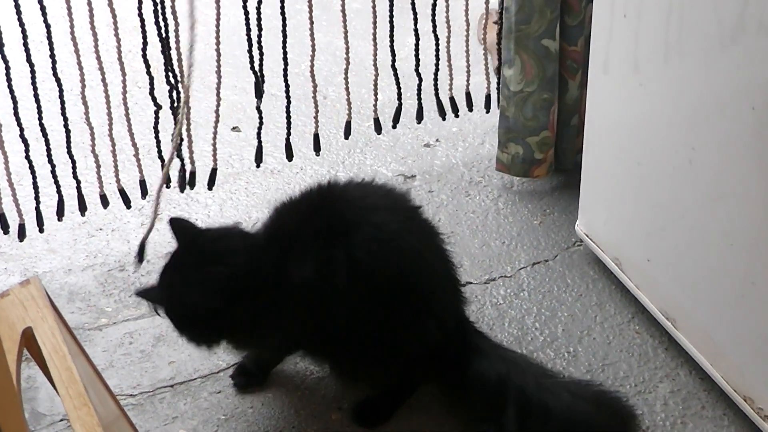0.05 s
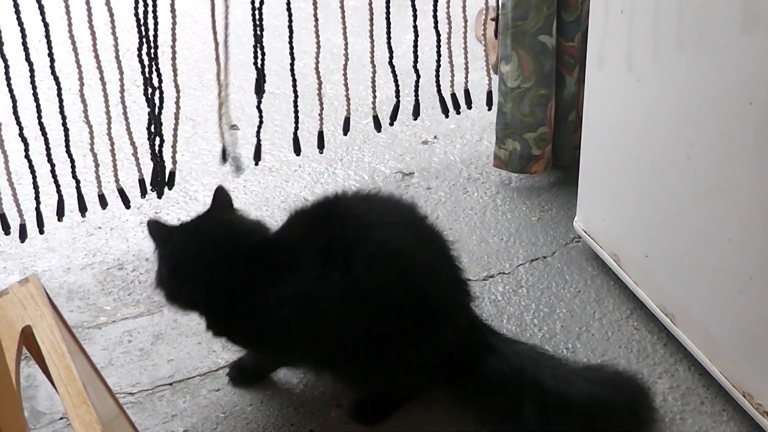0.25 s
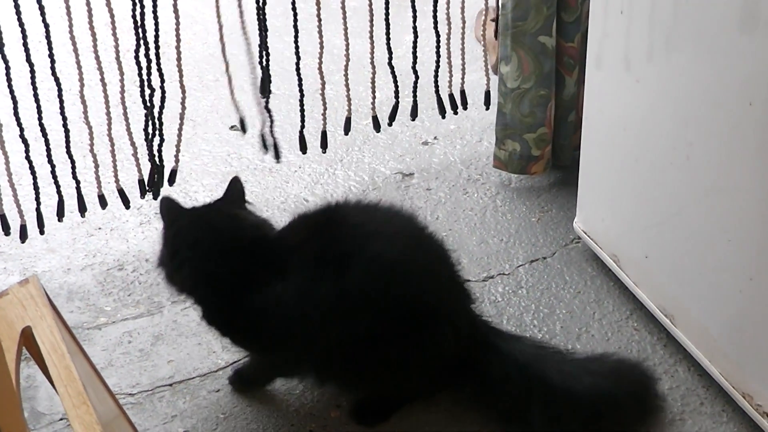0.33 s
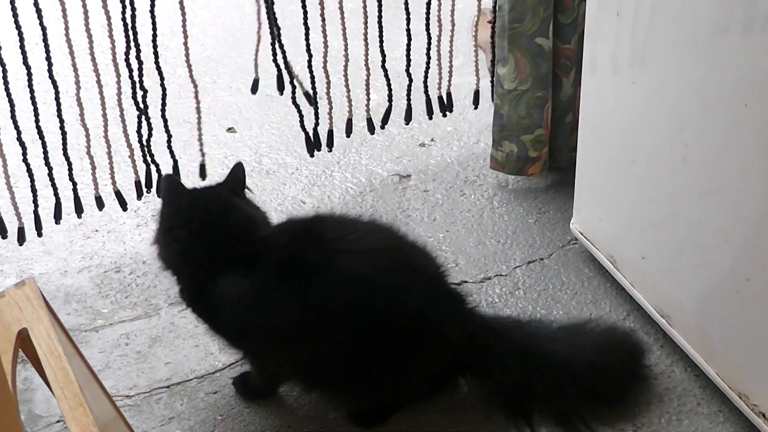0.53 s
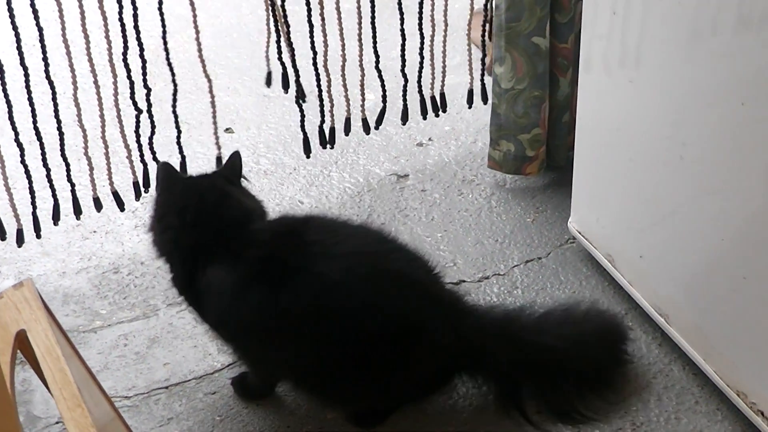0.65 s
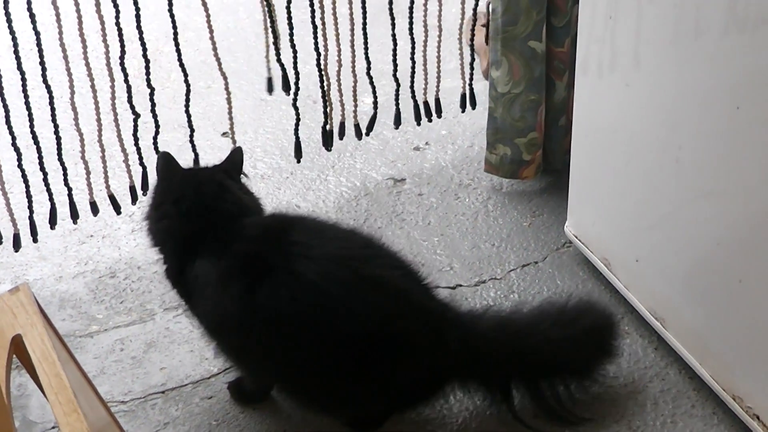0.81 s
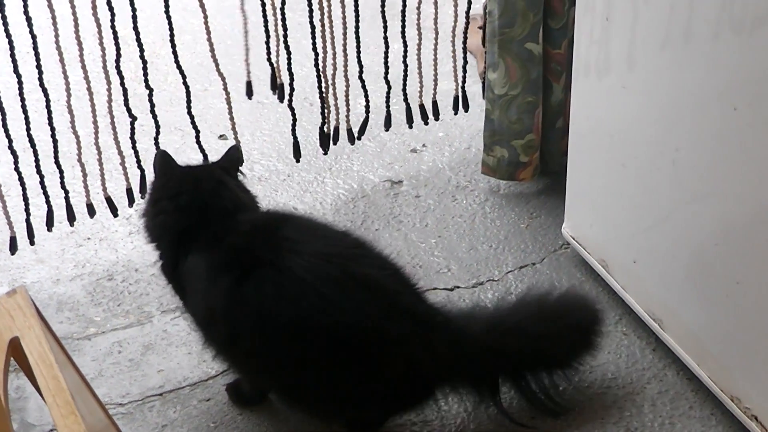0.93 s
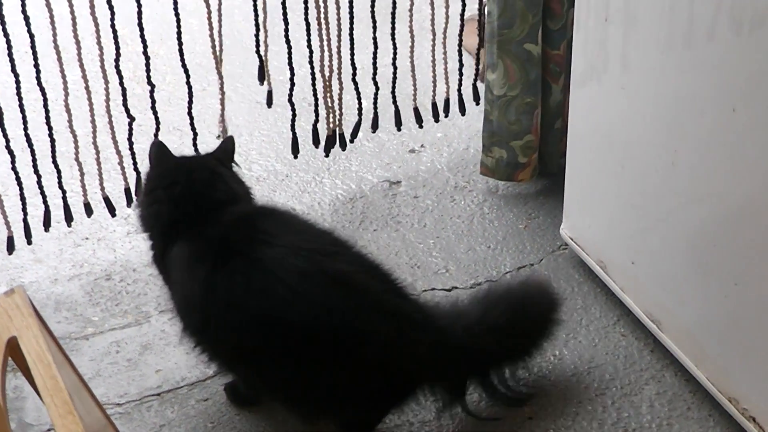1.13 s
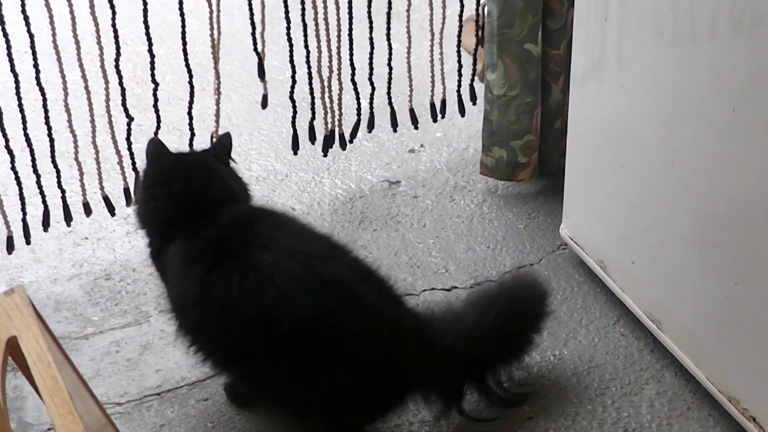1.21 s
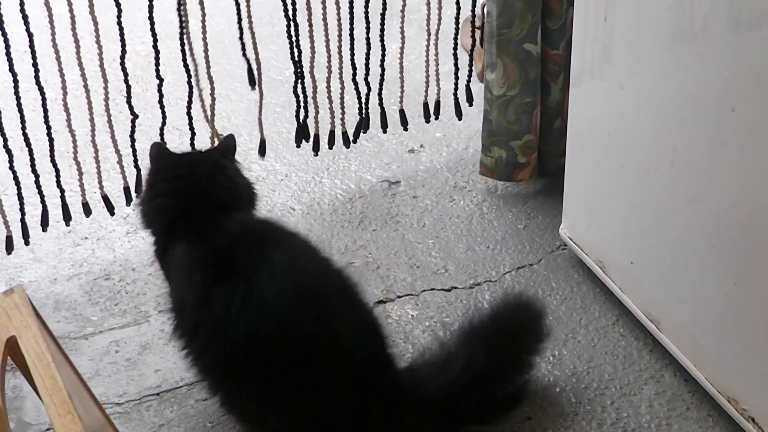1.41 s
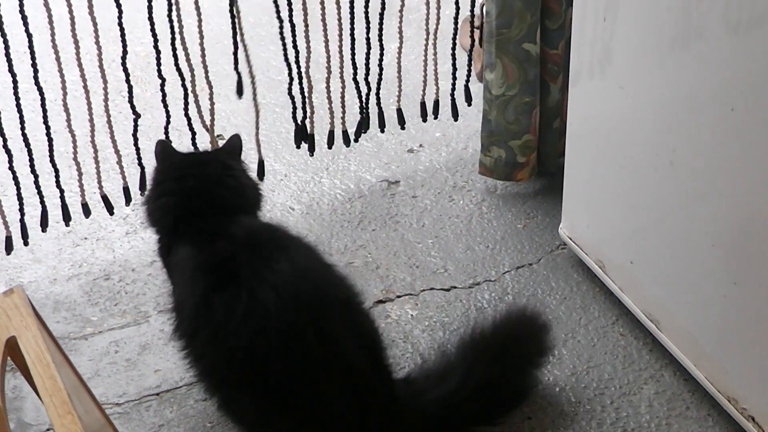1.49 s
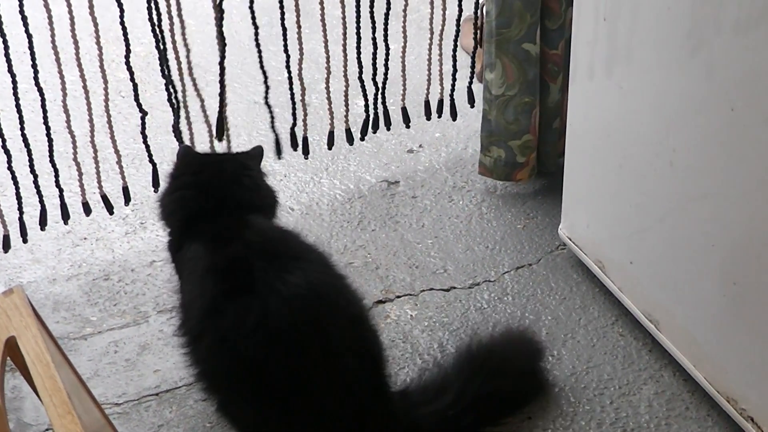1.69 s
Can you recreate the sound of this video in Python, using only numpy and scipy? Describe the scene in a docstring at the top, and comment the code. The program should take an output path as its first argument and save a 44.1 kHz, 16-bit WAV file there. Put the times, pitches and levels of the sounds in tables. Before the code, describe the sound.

Hard, bright bead clicks in short clusters at a doorway, with a quiet airy background.

```python
"""Cat through a bead curtain

A cat brushes through a bead curtain in the doorway of a small bare room, heard in stereo.
Strands meet in short clusters of hard, bright clicks: shaped snaps with a shiver, echoes and room.
The hardest one overloads the recorder: a dull one-sided dip. A heavier bead knocks on broad
resonances, sliding strands crackle in random grains and the cat scuffs in dull noise.
Behind lie a steady outdoor wash of filtered noise and a hum of wavering sines."""
import sys
import numpy as np
from scipy import signal
from scipy.fft import rfft, irfft
from scipy.io import wavfile
from scipy.ndimage import uniform_filter1d

SR = 44100
rng = np.random.default_rng(int(sys.argv[2]) if len(sys.argv) > 2 else 0)


def wav_record(signal):
    """Record a signal, one row per channel, as 16-bit PCM in the file named by sys.argv[1]."""
    frames = np.transpose(np.atleast_2d(signal))
    bounded = np.clip(frames, -1, 1)
    # unit amplitude maps onto the largest positive 16-bit level
    quanta = np.round(bounded * 32767).astype(np.int16)
    wavfile.write(sys.argv[1], SR, quanta)


N = 77175  # length [samples]

# Bead against bead:
# (time [s], snap peak before panning [dB], left over right [dB], pitch [Hz], room and shiver [dB])
CLICKS = [(0.2478, -16, 3, 10500, -5), (0.2492, -21, 1, 10900, 2), (0.2498, -8.5, -1, 10500, -1.5),
          (0.2509, -15.5, 0, 10000, 3), (0.2510, -23, -6, 9700, 1), (0.2536, -19, -3, 10300, -2),
          (0.254, -14, -1, 10600, -3.5), (1.311, -44, 0, 10500, -3), (1.3244, -35, 0, 10500, 0),
          (1.3278, -20.5, 0, 11200, -3.5), (1.3365, -34.5, 2, 7400, 1), (1.3536, -39, 0, 10100, -1),
          (1.384, -31, -1, 11300, 4), (1.3878, -27, -3, 10000, 1), (1.4168, -31, 0, 9700, -5),
          (1.4192, -30, -2, 8400, -1), (1.4220, -34, 1, 5900, 1.5), (1.429, -42, 0, 5700, 1),
          (1.4526, -35, 0, 10500, -2), (1.4622, -18.5, 2, 11100, -2.5), (1.4690, -24, 0, 10500, -7.5),
          (1.4726, -32.5, 2, 6660, 1), (1.7266, -38, -7, 10500, 1)]
# Relative colour of a click pitched at COLOUR_HZ: (frequency [Hz], level [dB])
CLICK_COLOUR = [(100, -37), (700, -39), (1500, -15), (2000, -24.5), (2700, -21), (3500, -26.5), (4500, -15),
                (6500, -8), (8200, -3.5), (10000, 1.5), (12000, 0), (14000, -12), (16000, -15)]
COLOUR_HZ = 10500
WASH_EDGE_HZ, RECORDER_EDGE_HZ = 15800, 16400  # upper band limits
BACKGROUND_SIDE_DB = -0.84  # left over right


def amp(db):
    """Decibels to gain."""
    return 10 ** (np.asarray(db) / 20)


def unit(x):
    """Scales to rms 1."""
    return x / np.sqrt(np.mean(x ** 2) + 1e-20)


def read(points, hz):
    """Reads a table on a log-frequency axis."""
    f, value = np.transpose(points)
    return np.interp(np.log(hz + 1), np.log(f + 1), value)


def pan(db):
    """Left and right gains for a level difference, left over right."""
    return amp(np.array([[db], [-db]]) / 2)


def add(mix, s, sound):
    """Mixes a sound in at a time in seconds."""
    part = mix[:, max(round(s * SR), 0):][:, :sound.shape[-1]]
    part += sound[..., :part.shape[1]]


def bump(middle_s, spread_s):
    """A Gaussian swell in time, peak 1."""
    return np.exp(-.5 * ((np.arange(N) / SR - middle_s) / spread_s) ** 2)


def convolve(x, response):
    """Passes a sound through a response."""
    return signal.fftconvolve(np.atleast_2d(x), np.atleast_2d(response), axes=1)[:, :N]


def low_pass(x, hz):
    """Steep band limit without delay."""
    taps = signal.firwin(255, hz, window=("kaiser", 8), fs=SR)
    return signal.oaconvolve(x, taps[None], "same")


def drift(rate_hz):
    """Slow random wander of rms 1: noise with a Gaussian roll-off set by rate_hz."""
    hz = np.fft.rfftfreq(N, 1 / SR)
    spectrum = rfft(rng.standard_normal(N))
    return unit(irfft(spectrum * np.exp(-(hz / rate_hz) ** 2), N))


def snap(colour, size=2048):
    """The shortest causal (minimum-phase) pulse with a given colour, peak 1."""
    log_gain = np.log(amp(read(colour, abs(np.fft.fftfreq(size, 1 / SR)))))
    spectrum = np.exp(np.conj(signal.hilbert(log_gain)))
    pulse = np.fft.ifft(spectrum).real[:size // 2]
    return pulse / abs(pulse).max()


def noise_pair(size, count=N):
    """Short-time spectra of noise at two close microphones, alike by a different amount in each band."""
    # Left-right likeness: (frequency [Hz], correlation [0 to 1])
    likeness = [(50, 0.75), (500, 0.84), (1500, 0.88), (3000, 0.82), (5000, 0.59), (9000, 0.81),
                (13000, 0.069)]
    noise = rng.standard_normal((2, count))
    hz, t, (a, b) = signal.stft(noise, SR, nperseg=size, noverlap=size - size // 4)
    same = np.clip(read(likeness, hz), -1, 1)[:, None]
    return hz, t, np.array([a, same * a + np.sqrt(1 - same ** 2) * b])


def to_sound(z, size):
    """Short-time spectra back to sound."""
    return signal.istft(z, nperseg=size, noverlap=size - size // 4)[1][:, :N]


def tail(t60, build_s):
    """A grainy decay of energy 1: reflections arrive in clumps, each band dying at its own speed."""
    clump_db = 4
    hz, t, z = noise_pair(size=256, count=12800)
    out = to_sound(z * amp(-60 * t / read(t60, hz)[:, None]), size=256)
    count = out.shape[1]
    clumps = unit(uniform_filter1d(rng.standard_normal(count), size=20))
    build = 1 - np.exp(-np.arange(count) / SR / build_s)
    out = out * amp(clump_db * np.minimum(clumps, 2)) * build
    return out / np.linalg.norm(out, axis=1, keepdims=True)


def room():
    """The small bare room's reply builds up over milliseconds, then dies away band by band."""
    # Decay time by band: (frequency [Hz], time to fall 60 dB [s])
    room_t60 = [(300, 0.44), (1500, 0.13), (5000, 0.28), (9000, 0.26), (12000, 0.2), (16000, 0.27)]
    return tail(room_t60, build_s=0.0056)


def wash():
    """Distant outdoor noise and thin hiss, in slowly shifting patches of time and frequency."""
    # Relative colour of the background: (frequency [Hz], density [dB per Hz])
    wash_colour = [(20, -3.5), (40, -6.5), (70, -9), (120, -17), (200, -8.5), (400, -8), (600, -6),
                   (780, -4.5), (1000, -5), (1530, -3.5), (1750, -8.5), (2100, -10), (2550, -23),
                   (3400, -24), (4200, -16), (5000, -15), (7000, -18), (10000, -18.5), (11500, -21.5),
                   (13000, -26), (15700, -32.5)]
    level_db, patch_db = -49.5, 2  # rms before panning, rms of the patches
    hz, t, z = noise_pair(size=2048)
    patches = uniform_filter1d(rng.standard_normal(z.shape[1:]), size=8, axis=0)  # across frequency
    patches = unit(uniform_filter1d(patches, size=10, axis=1))  # across time
    gain = amp(read(wash_colour, hz)[:, None] + patch_db * patches)
    sound = low_pass(to_sound(z * gain, size=2048), WASH_EDGE_HZ)
    return amp(level_db) * pan(BACKGROUND_SIDE_DB) * unit(sound)


def hum():
    """Faint tones of a far machine: sines that waver in pitch and flutter in level."""
    # Machine tones: (mean frequency [Hz], rms level before panning [dB])
    hum_tones = [(74.3, -65.5), (100, -71), (149, -73), (268, -72), (299, -63.5), (468, -67.5), (492, -76),
                 (736, -65)]
    waver_hz, flutter = 1.82, 0.33  # rms pitch wander, rms fraction of level
    total = np.zeros(N)
    for hz, db in hum_tones:
        level = 1 + flutter * drift(5.0)
        cycles = rng.random() + np.cumsum(hz + waver_hz * drift(6.85)) / SR
        total += amp(db) * unit(level * np.sin(2 * np.pi * cycles))
    return pan(BACKGROUND_SIDE_DB) * total


def shuffle():
    """A faint, dull scuff as the cat shifts its weight on the floor: a short swell of coloured noise."""
    # Relative colour of the scuff: (frequency [Hz], level [dB])
    scuff_colour = [(100, -28), (280, 12), (480, 12), (850, 15), (1500, -13), (3000, -42), (16000, -47)]
    level = amp(-51.5) * bump(middle_s=0.12, spread_s=0.012)
    return level * unit(convolve(rng.standard_normal(N), snap(scuff_colour)))


def clicks():
    """Each contact is a tiny snap, followed by the strand's shiver, near echoes and the room."""
    # Early echoes off the door and floor: (delay [s], left level [dB], right level [dB])
    early_echoes = [(.0003, -13, -11), (.0012, -20, -15), (.00285, -22, -4.5), (.0039, -18, -18),
                    (.0066, -19, -19), (.0103, -24, -17)]
    shiver_db, shiver_t60 = 0.5, 0.034  # relative to the room; time to fall 60 dB [s]
    out, source = np.zeros((2, N)), np.zeros((1, N))
    for s, db, side_db, pitch_hz, room_db in CLICKS:
        # Larger beads and softer contacts shift the colour down.
        colour = [(hz * pitch_hz / COLOUR_HZ, level) for hz, level in CLICK_COLOUR]
        pulse = amp(db) * snap(colour)
        shiver = amp(shiver_db) * tail([(1, shiver_t60)], build_s=0.0005)
        space = amp(room_db) * (room() + shiver)
        add(out, s, pan(side_db) * pulse)
        add(out, s, low_pass(convolve(pulse, space), WASH_EDGE_HZ))
        add(source, s, pulse)
    for delay_s, left_db, right_db in early_echoes:
        add(out, delay_s, amp([[left_db], [right_db]]) * source)
    return out


def overload():
    """The recorder overloads on the hardest click: a brief, dull one-sided dip."""
    hardest_s = max(CLICKS, key=lambda row: row[1])[0]
    return -amp(-24) * bump(hardest_s, spread_s=0.00013)


def resound(colour, side_db, chatter_db, chatter_t60, room_db):
    """One blow on a set of broad resonances: the strike, its quick chatter and the room."""
    blow = amp(chatter_db) * tail([(1, chatter_t60)], build_s=0.00038)
    blow[:, 0] += 1  # the strike itself
    return convolve(pan(side_db) * blow + amp(room_db) * room(), snap(colour))


def knock():
    """A heavier bead rattles on something hollow: a woody body, and a bright ring off to the left."""
    # The heavy bead and its rebounds: (time [s], body strike [dB], ring strike [dB])
    blows = [(0.5277, -32, -29), (.5289, -29, -25), (0.5328, -35, -32), (0.5385, -36, -45),
             (.5590, -41, -45)]
    # Relative colour of the woody body: (frequency [Hz], level [dB])
    body_colour = [(150, -16), (450, -7), (700, -7.5), (900, -9), (1080, 1), (1330, 1.5), (1600, -7),
                   (1950, -5), (2400, -13), (3000, -20), (3600, -35), (16000, -60)]
    # Relative colour of the bright ring: (frequency [Hz], level [dB])
    ring_colour = [(200, -40), (3600, -32), (4050, -6), (4550, 0), (5100, 2.5), (5750, -3), (6200, -11),
                   (6900, -3), (7250, -5), (7650, 3), (8200, -7), (9100, -7), (9650, 0), (10300, -9),
                   (11600, -6), (12900, -11), (14000, -8), (16000, -18)]
    out = np.zeros((2, N))
    for s, body_db, ring_db in blows:
        body = resound(body_colour, side_db=1, chatter_db=1, chatter_t60=.03, room_db=1)
        ring = resound(ring_colour, side_db=9, chatter_db=4, chatter_t60=.02, room_db=4)
        add(out, s, amp(body_db) * body)
        add(out, s, amp(ring_db) * ring)
    return low_pass(out, WASH_EDGE_HZ)


def tilted(colour, db_per_octave, from_hz=4000):
    """Makes the treble of a colour brighter or duller."""
    return [(hz, db + db_per_octave * np.log2(max(hz / from_hz, 1))) for hz, db in colour]


def rustle():
    """Strands sliding past each other make a fine crackle of tiny contacts, duller than the clicks."""
    # Slides: (middle [s], spread [s], level before panning and room [dB])
    slides = [(1.318, 0.0057, -61), (1.345, 0.016, -51.5), (1.391, 0.0061, -48.5), (1.420, 0.004, -56),
              (1.458, 0.0028, -44), (1.473, 0.0085, -52), (1.579, 0.0033, -54), (1.698, .003, -54),
              (1.728, 0.0063, -53)]
    grains_per_s, grain_spread_db, room_db = 2000, 3, -3.5
    level = sum(amp(db) * bump(s, spread) for s, spread, db in slides)
    contacts = rng.random(N) < grains_per_s / SR
    signs = rng.choice([-1, 1], N)
    grains = contacts * signs * amp(grain_spread_db * rng.standard_normal(N))
    colour = tilted(CLICK_COLOUR, db_per_octave=-9.5)
    sound = level * unit(convolve(grains, snap(colour)))
    return low_pass(pan(-2.2) * sound + amp(room_db) * convolve(sound, room()), WASH_EDGE_HZ)


def scene():
    """Cat and beads in the doorway over the background, with the recorder's overload."""
    return wash() + hum() + shuffle() + clicks() + overload() + knock() + rustle()


def record(dry):
    """The recorder's band limit."""
    return low_pass(dry, RECORDER_EDGE_HZ)


dry = scene()
out = record(dry)
wav_record(out)
```